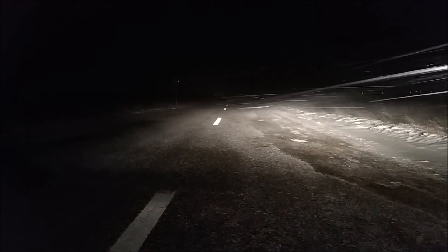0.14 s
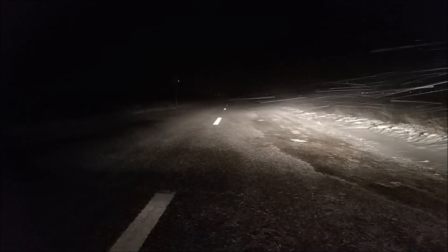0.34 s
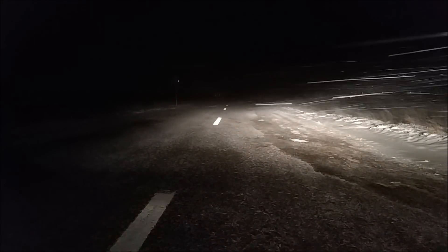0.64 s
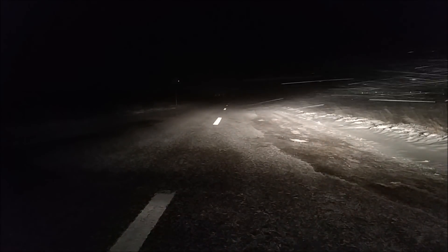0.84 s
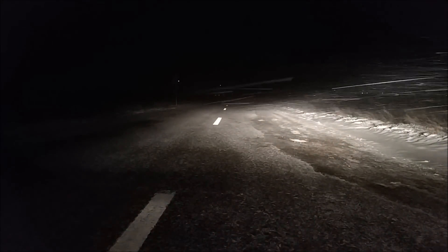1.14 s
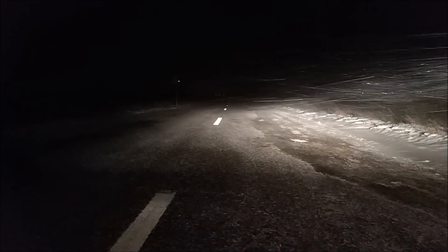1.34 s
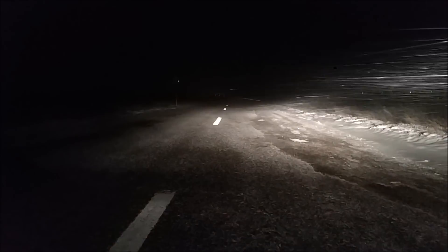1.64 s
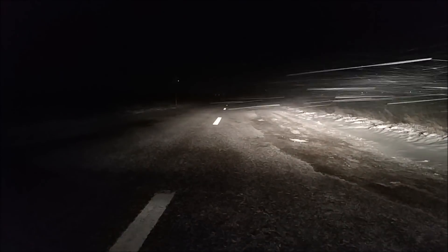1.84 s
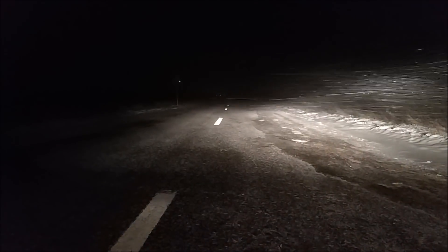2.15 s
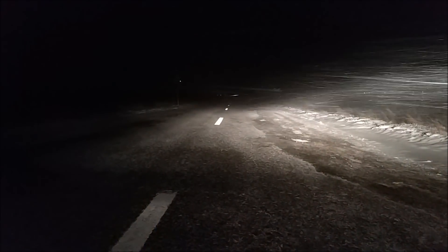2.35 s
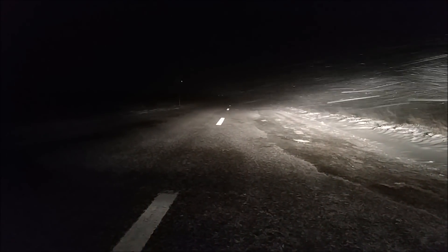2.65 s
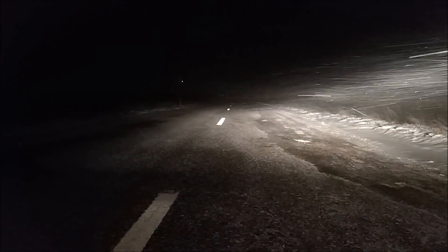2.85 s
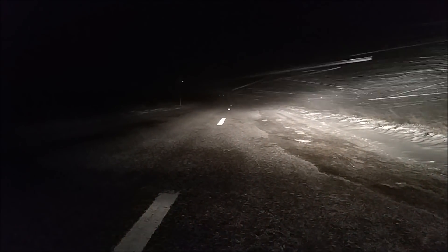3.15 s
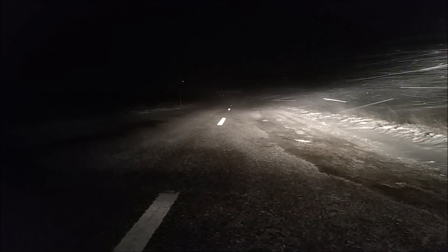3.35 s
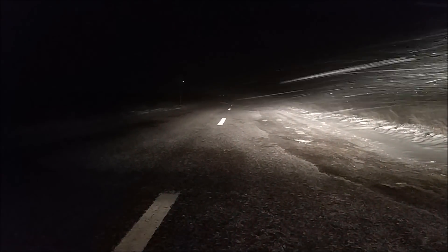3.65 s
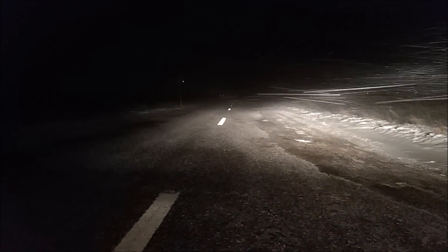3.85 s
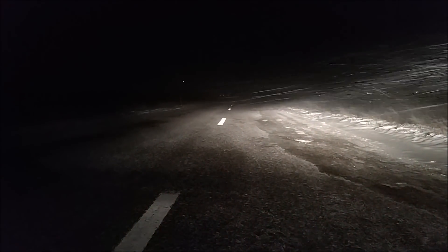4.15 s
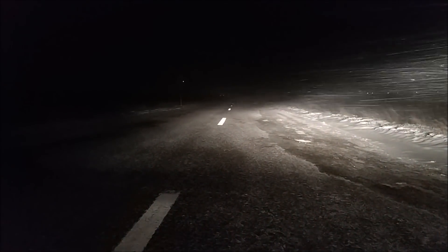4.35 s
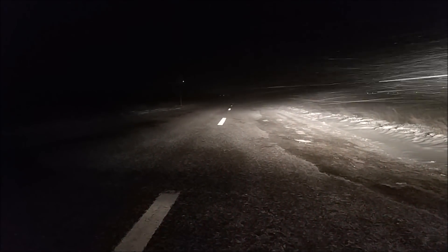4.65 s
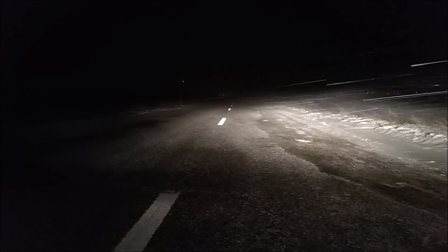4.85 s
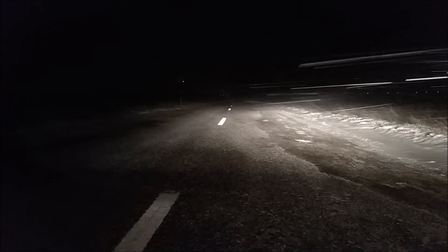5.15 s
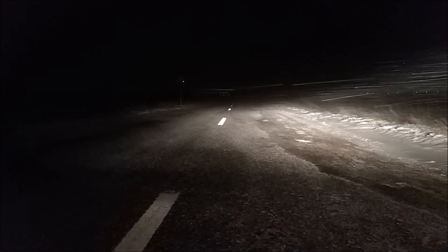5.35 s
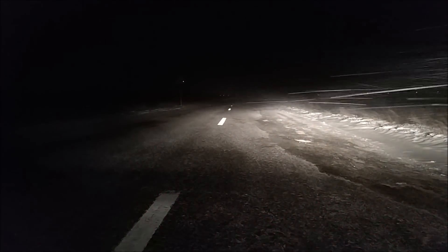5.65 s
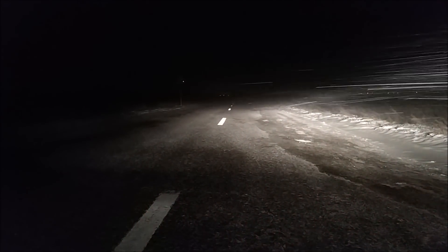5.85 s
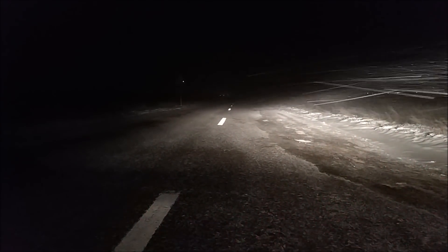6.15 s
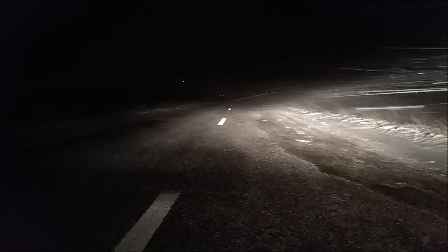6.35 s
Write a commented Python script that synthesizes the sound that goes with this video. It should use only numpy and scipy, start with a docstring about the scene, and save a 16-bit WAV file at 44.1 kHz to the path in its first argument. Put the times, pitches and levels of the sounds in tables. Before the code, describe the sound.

Outdoors on an open snowy road, wind hits a small unprotected microphone in irregular lumps, with dull thuds and occasional rough snaps. Beneath it a four-cylinder diesel idles steadily, knocking and ticking quickly. Gusts are strongest in the first two seconds and again around four, with a few scratchy snow bursts; then the wind eases and the engine remains.

```python
"""Night storm on an open road

Gusts tumble over a small microphone: filtered noise in lumps, with low ringing thuds where strong eddies pass.
The hardest eddies also crack on the port as short rough snaps, and blown snow brushes the case in noise bursts.
A four-cylinder diesel idles close by, each firing a dull knock and a bright tick of noise.
Deep bass is filtered out of every source, and a gain control turns the loud moments down."""
import sys
import numpy as np
from scipy import signal
from scipy.fft import rfft, irfft
from scipy.io import wavfile
from scipy.ndimage import uniform_filter1d, map_coordinates

SR = 44100
rng = np.random.default_rng(int(sys.argv[2]) if len(sys.argv) > 2 else 0)


def ratio(d):
    """dB to gain"""
    e = np.asarray(d, float) / 20
    return 10 ** e


def inscribe(sig):
    """Save sig as 16-bit PCM at rate SR to the path in sys.argv[1].

    A 1-D sig is mono; a 2-D sig holds one channel per row.
    Samples are clipped to [-1, 1] before scaling.
    """
    pcm = np.round(np.clip(np.atleast_2d(sig).T, -1, 1) * 32767)
    wavfile.write(sys.argv[1], SR, pcm.astype(np.int16))


N = 286650


def unit(x):
    """Scaled to rms 1."""
    return x / np.sqrt(np.mean(x ** 2) + 1e-20)


def curves(rows):
    """One value per sample for each column after the time."""
    s, *cols = np.transpose(rows)
    return [np.interp(np.arange(N) / SR, s, c) for c in cols]


def wobble(rate):
    """A smooth random curve, rate knots a second."""
    knots = rng.standard_normal(int(N * rate / SR) + 4)
    return map_coordinates(knots, [np.arange(N) * rate / SR])


def coloured(x, spectrum, peaks=()):
    """x through a causal minimum-phase filter of (Hz, dB) points, lifted by (Hz, width Hz, dB) resonances."""
    m = 2 ** 14
    hz = np.fft.rfftfreq(m, 1 / SR)
    f, db = np.transpose(spectrum)
    power = ratio(np.interp(np.log(hz + 1), np.log(f + 1), db)) ** 2
    for centre, width, peak_db in peaks:
        power *= 1 + ratio(peak_db) ** 2 / (1 + (2 * (hz - centre) / width) ** 2)
    # folding the cepstrum onto positive times makes the filter causal
    cepstrum = irfft(np.log(power + 1e-12) / 2, m)
    cepstrum[1:m // 2] *= 2
    cepstrum[m // 2 + 1:] = 0
    impulse = irfft(np.exp(rfft(cepstrum)), m)[:m // 2]
    return signal.oaconvolve(x, impulse)[:N]


def gusts():
    """Gains of big and small eddies: each gust rises, swells to a crest and falls over the breeze."""
    # wind between the gusts: t/s, big eddies level/dB, small eddies above them/dB
    breeze = [(0, -51.5, 2), (.4, -56.5, -7.5), (.75, -52, -3.5), (1.05, -44.5, -18), (1.93, -48.5, -6),
              (1.99, -63, 14), (2.07, -66.5, 8), (2.12, -58.5, 2.5), (2.4, -59.5, 1), (2.65, -54, -1.5),
              (2.92, -56, -3.5), (2.95, -69, 1), (3.0, -56, 3.5), (3.22, -54.5, -2), (3.45, -49.5, -10),
              (4.25, -52, -2.5), (4.35, -50.5, -5), (5.0, -55.5, -3), (5.45, -63, 4.5), (6.2, -62.5, 4),
              (6.5, -60, -1)]
    # gusts over the microphone: start t/s, held/s, big eddies level at the crest/dB, small eddies above them/dB
    gust_rows = [(0.046, 0.19, -36.5, -10.5), (.185, 0.081, -34.5, -13), (0.27, 0.079, -36.5, -7.5),
                 (0.384, 0.031, -44, -8), (.5, 0.082, -39, -8.5), (.615, 0.034, -40, -4),
                 (.665, 0.015, -40, -8), (.815, 0.066, -39, -9), (.97, 0.11, -55, -26),
                 (1.17, 0.066, -37, -2.5), (1.288, 0.065, -31, -1.5), (1.422, 0.059, -34, -8),
                 (1.51, 0.09, -44.5, -19), (1.585, 0.13, -33, -2), (1.79, 0.024, -44, -13),
                 (1.855, 0.071, -40.5, -12), (1.925, 0.031, -49.5, -4), (2.29, 0.038, -44, -18),
                 (2.446, 0.068, -36, -8), (2.5, .04, -42, -8), (2.58, 0.016, -41.5, -16),
                 (2.735, 0.028, -49.5, -5), (2.855, 0.073, -46.5, -3), (3.025, 0.029, -44.5, -11),
                 (3.264, 0.067, -39, -19), (3.385, 0.046, -39.5, -6.5), (3.455, 0.016, -41.5, -6),
                 (3.53, 0.091, -42.5, -6), (3.68, 0.11, -43.5, -4.5), (3.755, 0.058, -34.5, -12),
                 (3.86, 0.045, -36.5, -6.5), (3.925, 0.046, -39.5, -4.5), (3.979, 0.044, -33, 2),
                 (4.053, .035, -40, 7), (4.12, 0.13, -42, -13.5), (4.535, 0.096, -40.5, 0),
                 (6.28, 0.13, -50.5, -2)]
    rise_db_per_s, fall_db_per_s = 899, 600
    crest = 0.56  # share of the hold that passes before the crest
    swell_db, small_swell_db = 1, 9.5  # how far under the crest the ends of the hold lie
    calm_db, calm_small_db = curves(breeze)
    calm_db = calm_db + 3.44 * wobble(22)
    big, small = ratio(calm_db) ** 2, ratio(calm_db + calm_small_db) ** 2  # powers
    t = np.arange(N) / SR
    for s, held, big_db, small_db in gust_rows:
        near = slice(max(round((s - .1) * SR), 0), round((s + held + .2) * SR))
        early = np.maximum(s - t[near], 0)
        late = np.maximum(t[near] - s - held, 0)
        level_db = big_db - rise_db_per_s * early - fall_db_per_s * late
        off_crest = np.interp(t[near], [s, s + crest * held, s + held], [1, 0, 1]) ** 2
        big[near] += ratio(level_db - swell_db * off_crest) ** 2
        small[near] += ratio(level_db + small_db - small_swell_db * off_crest) ** 2
    return np.sqrt(big), np.sqrt(small)


def eddies(per_s, spread_db, smooth):
    """Sparse pressure kicks of uneven size on a share of smooth turbulence."""
    chance, size, calm = rng.random(N), rng.standard_normal(N), rng.standard_normal(N)
    kicks = (chance < per_s / SR) * np.sign(calm) * ratio(spread_db * size)
    return unit(kicks) + smooth * calm


def buffeting():
    """Large eddies rumble at the microphone, small ones flutter above them; both come in the same lumps."""
    # rumble of the large eddies: f/Hz, relative level/dB per Hz
    big_spectrum = [(24, -79), (40, -57), (59, -46), (97, -21), (200, 5), (450, -13), (580, -36.5),
                    (990, -120)]
    # flutter of the small eddies: f/Hz, relative level/dB per Hz
    small_spectrum = [(150, -43), (300, -3.5), (450, -2), (700, -4), (1100, -16.5), (2000, -44.5),
                      (4000, -67)]
    big_gain, small_gain = gusts()
    lumps = ratio(2.2 * wobble(45))  # fast lumps in the turbulence, depth in dB
    big_kicks = eddies(per_s=400, spread_db=0.5, smooth=1.55)
    small_kicks = eddies(per_s=500, spread_db=4, smooth=1.35)
    big = unit(coloured(lumps * big_kicks, big_spectrum))
    small = unit(coloured(lumps * small_kicks, small_spectrum))
    return big_gain * big + small_gain * small


def patchy(x, broad_db, fine_db):
    """Random gain in broad patches of pitch and in narrow, briefly ringing ones."""
    z = signal.stft(x, nperseg=1024)[2]
    broad, fine = rng.standard_normal((2, *z.shape))
    broad = uniform_filter1d(uniform_filter1d(broad, size=30, axis=0), size=2, axis=1)
    fine = uniform_filter1d(fine, size=3, axis=1)
    gain = ratio(broad_db * unit(broad) + fine_db * unit(fine))
    return signal.istft(z * gain, nperseg=1024)[1][:N]


def engine():
    """Every firing sets off a dull knock and a bright tick of noise that sink away until the next cylinder."""
    # engine as the wind carries it: t/s, knock level/dB before its lift below, tick level/dB likewise
    idle = [(0, -54, -53), (1.6, -55, -54.5), (2.24, -54, -54), (3.0, -52.5, -52.5), (4.1, -54, -53.5),
            (4.65, -52.5, -53.5), (4.9, -52.5, -53), (6.5, -53, -52)]
    # cylinders in firing order: knock relative level/dB, tick relative level/dB
    cylinders = [(3, 2.5), (3.5, 2), (3.5, 4.5), (3.5, 5.5)]
    # resonances of engine block and bonnet: f/Hz, width/Hz, level/dB before the lift below
    block = [(211, 61, -6), (690, 62, 1.5), (1081, 60, -0.5), (1528, 99, -7), (2234, 130, -5.5),
             (3015, 110, 0), (4280, 93, 3.5), (4700, 140, -13)]
    # knock: f/Hz, relative level/dB per Hz
    knock_spectrum = [(100, -42.5), (200, -12), (450, -27.5), (600, -14), (1100, -8), (1800, -11),
                      (3200, -19), (5000, -31.5), (8000, -57.5)]
    # tick of valves and injectors: f/Hz, relative level/dB per Hz
    tick_spectrum = [(400, -46), (1470, -20), (2500, -16), (2960, -7.5), (3210, -5), (4440, -2.5),
                     (6830, -4), (9390, 0.5), (9940, -5), (10500, -21.5), (11000, -31), (11300, -67)]
    first_s, firing_hz = .022, 27.635
    firing = (np.arange(N) / SR - first_s) * firing_hz
    number = np.floor(firing).astype(int) + 1
    since = firing % 1 / firing_hz  # s after the latest firing
    knock_db, tick_db = np.transpose(cylinders)[:, (number - 1) % len(cylinders)]
    burn, clack = rng.standard_normal((number.max() + 1, 2))[number].T  # no two burns alike
    sudden, gradual = 1 - np.exp(-since / 0.00089), 1 - np.exp(-since / 0.0014)
    knock_db = knock_db + 0.4 * burn - 7.66 * (since / 0.026) ** 1.9
    tick_db = tick_db + 0.22 * burn + 2.0 * clack - 7.5 * (since / 0.027) ** 0.99
    knock = 0.16 + sudden * ratio(knock_db)  # the constant is a steady floor of noise
    tick = 0.35 + gradual * ratio(tick_db)
    knock, tick = uniform_filter1d([knock, tick], size=260, axis=1)  # the blows spread over a few ms
    resonances = [(hz, width, db + 8) for hz, width, db in block]
    rattle = patchy(rng.standard_normal(N), broad_db=1.37, fine_db=4.5)
    clatter = patchy(rng.standard_normal(N), broad_db=0.82, fine_db=5.0)
    low = unit(coloured(knock * rattle, knock_spectrum, resonances))
    high = unit(coloured(tick * clatter, tick_spectrum))
    low_db, high_db = curves(idle) + 0.48 * wobble(11)  # both levels waver together on the way here
    return ratio(low_db + 4.0) * low + ratio(high_db + 0.02) * high


def thuds():
    """Each strong eddy swings the diaphragm for a cycle or two, quick to rise and slower to settle."""
    # strong single eddies: peak t/s, peak level/dB before the filter, ring f/Hz, length at half height/s
    thud_rows = [(0.0517, -30, 242, 0.004), (0.086, -23, 270, 0.0049), (0.104, -18, 254, 0.0027),
                 (0.1244, -24, 283, 0.0051), (0.1464, -25.5, 360, 0.0067), (0.167, -24.0, 257, 0.0045),
                 (0.191, -24.5, 321, 0.0034), (0.2173, -19.5, 443, 0.0038), (0.225, -22, 316, 0.0035),
                 (0.235, -30, 260, 0.0034), (0.275, -24, 260, 0.0036), (0.2963, -19.5, 263, 0.0063),
                 (0.3229, -20, 290, 0.0044), (0.5223, -25.5, 252, 0.0057), (0.5507, -22.5, 242, 0.0069),
                 (0.564, -24.5, 423, 0.0027), (0.57, -21, 277, 0.0052), (0.625, -26, 370, 0.0074),
                 (0.6455, -29.5, 356, 0.0038), (0.832, -17.5, 321, 0.0027), (0.857, -29.0, 270, 0.005),
                 (1.1856, -12.5, 373, 0.0022), (1.212, -30, 303, 0.0048), (1.236, -32, 272, 0.0046),
                 (1.2905, -25, 257, 0.0038), (1.31, -14.5, 363, 0.0029), (1.3264, -26, 315, 0.0035),
                 (1.3355, -15.5, 268, 0.0061), (1.351, -17, 272, 0.006), (1.363, -25, 277, 0.0037),
                 (1.4375, -18, 460, 0.0033), (1.452, -16.5, 318, 0.0034), (1.4616, -18.5, 288, 0.0051),
                 (1.5675, -30, 228, 0.009), (1.6, -26, 341, 0.0032), (1.6177, -28, 279, 0.0043),
                 (1.626, -19, 238, 0.0087), (1.651, -10, 445, 0.0024), (1.6732, -19, 344, 0.0028),
                 (1.6883, -17, 320, 0.0031), (1.714, -26, 307, 0.0058), (1.802, -26.5, 280, 0.0036),
                 (1.868, -31, 227, 0.0131), (1.9035, -21.0, 330, 0.0029), (2.4647, -26.5, 249, 0.016),
                 (2.4796, -23, 304, 0.0056), (2.51, -29.5, 278, 0.0039), (2.586, -33, 256, 0.0064),
                 (2.915, -24, 245, 0.006), (3.273, -25.5, 294, 0.0044), (3.292, -35, 445, 0.0027),
                 (3.3196, -43, 281, 0.0031), (3.3906, -24, 364, 0.0033), (3.406, -18.5, 267, 0.0051),
                 (3.4283, -28.0, 273, 0.0036), (3.544, -30, 330, 0.003), (3.566, -28.0, 322, 0.0029),
                 (3.611, -37, 260, 0.0058), (3.6866, -28.5, 242, 0.0062), (3.7094, -27, 275, 0.0033),
                 (3.7615, -27.5, 322, 0.0024), (3.788, -26.5, 296, 0.0037), (3.7987, -17.5, 680, 0.0015),
                 (3.8045, -24, 342, 0.0032), (3.8698, -24.5, 323, 0.0038), (3.884, -23, 279, 0.0036),
                 (3.9283, -24.0, 455, 0.0041), (3.958, -18, 308, 0.0034), (3.9907, -14, 302, 0.0037),
                 (4.0045, -19, 586, 0.0015), (4.024, -23, 408, 0.003), (4.0385, -22, 420, 0.0048),
                 (4.0647, -21, 324, 0.0053), (4.0777, -19.5, 513, 0.0017), (4.16, -33, 270, 0.0083),
                 (4.1944, -29.5, 255, 0.011), (4.558, -20, 534, 0.0016), (4.5812, -17, 256, 0.0023),
                 (4.5892, -23.0, 360, 0.0045), (4.6036, -24, 286, 0.0038), (4.6386, -29.0, 376, 0.0024),
                 (5.815, -26, 490, 0.002)]
    lingers = 1.55  # fall over rise time
    half = SR // 40
    out, t = np.zeros(N + SR), np.arange(-half, half) / SR
    for (s, db, hz, length), phase in zip(thud_rows, rng.random((len(thud_rows), 1))):
        width = length * np.where(t < 0, 1, lingers) / (1 + lingers)
        swell = .5 ** ((np.abs(t) / width) ** 1.7)
        ring = np.cos(2 * np.pi * (hz * t + phase))
        out[round(s * SR) - half:][:len(t)] += ratio(db) * swell * ring
    return coloured(out[:N], [(40, -39), (130, -6.5), (180, -2), (1500, -3), (3300, -8)])


def snaps():
    """The hardest eddies also crack on the microphone port: a few rough cycles, part tone and part noise."""
    # hard edges of those eddies: start t/s, level/dB before the filter, pitch f/Hz
    snap_rows = [(0.212, -33, 770), (0.827, -35.5, 781), (0.855, -36.5, 1010), (1.185, -31.5, 786),
                 (1.295, -32, 781), (1.309, -33, 900), (1.436, -26.5, 781), (1.448, -36, 810),
                 (1.509, -38, 1020), (1.597, -40, 818), (1.65, -28.5, 781), (1.656, -32, 775),
                 (1.901, -43, 1110), (3.39, -38, 1050), (3.797, -23.5, 781), (3.806, -35, 1170),
                 (3.883, -34, 1050), (3.928, -36, 780), (3.954, -32, 789), (3.991, -39, 781),
                 (4.003, -31, 829), (4.036, -31.5, 816), (4.074, -30, 842), (4.559, -32, 867),
                 (5.816, -34.5, 781)]
    peak_s, roughness = .0012, 0.51  # time to the peak, noise rms against a tone of amplitude 1
    out, t = np.zeros(N + SR), np.arange(SR // 40) / SR
    u = t / peak_s
    draws = rng.standard_normal((len(snap_rows), len(t) + 1))
    for (s, db, hz), (phase, *hiss) in zip(snap_rows, draws):
        band = signal.butter(2, [hz / 2, hz * 2], 'bandpass', fs=SR, output='sos')
        rough = unit(signal.sosfilt(band, hiss))
        crack = np.cos(2 * np.pi * (hz * t + phase)) + roughness * rough
        out[round(s * SR):][:len(t)] += ratio(db) * u * np.exp(1 - u) * crack
    return coloured(out[:N], [(60, -39), (300, -0.5), (1600, -2), (2600, -18.5), (6000, -38)])


def snow():
    """Scratchy noise bursts where blown snow strikes the case, each trailed by a fainter, fading hiss."""
    # strikes on the case: start t/s, nominal level/dB before lift and filter, tilt/dB per octave
    strikes = [(3.2868, -24, -5), (3.298, -30, -1), (3.305, -36, -2), (4.528, -32, 4), (4.5426, -23.5, -2),
               (4.5558, -23, 1), (4.563, -29, -4), (4.582, -26.5, 1), (4.612, -22.5, -1),
               (4.634, -26.5, -2.5), (4.642, -40, 0), (4.745, -34, 2), (6.1486, -36.5, -3.5),
               (6.247, -27, 18)]
    # brushing: f/Hz, gain/dB
    brush_spectrum = [(400, -91), (900, 0), (2000, -4), (5000, -3), (9300, -0.5), (10300, -10),
                      (11100, -38), (11600, -63)]
    burst_s, trail_db, trail_s = 0.0063, -16.5, 0.016  # burst time scale, trail against burst, trail decay
    out, t = np.zeros(N + SR), np.arange(SR // 10) / SR
    octaves = np.log2(np.clip(np.fft.rfftfreq(len(t), 1 / SR), 900, 10000) / 4000)
    stroke = 2 * t / burst_s
    burst = stroke ** 2 * np.exp(-1.4 * stroke) * 1.26
    trail = ratio(trail_db) * (1 - np.exp(-stroke)) * np.exp(-t / trail_s)
    for s, db, tilt_db in strikes:
        tilted = rfft(rng.standard_normal(len(t))) * ratio(tilt_db * octaves)
        grit = unit(irfft(tilted, len(t)))
        out[round(s * SR):][:len(t)] += ratio(db + 2.0) * (burst + trail) * grit
    return coloured(out[:N], brush_spectrum)


def scene():
    """Wind and snow on the microphone over the idling engine, in one channel."""
    return (buffeting() + engine() + thuds() + snaps() + snow())[None]


def low_pass(x):
    """Removes everything above the highest recorded frequency."""
    return signal.sosfilt(signal.butter(12, 11270, fs=SR, output="sos"), x)


def record(dry):
    """Gain control follows the loudness over a threshold and lets go within a few tens of ms."""
    keep = np.exp(-1 / (0.02 * SR))  # 20 ms averaging
    power = signal.lfilter([1 - keep], [1, -keep], dry ** 2)
    level_db = 10 * np.log10(power + 1e-12)
    turned = dry * ratio(-.25 * np.maximum(level_db + 40.5, 0))  # a quarter dB down per dB over -40.5 dB
    return low_pass(turned)


dry = scene()
out = record(dry)
inscribe(out)
```